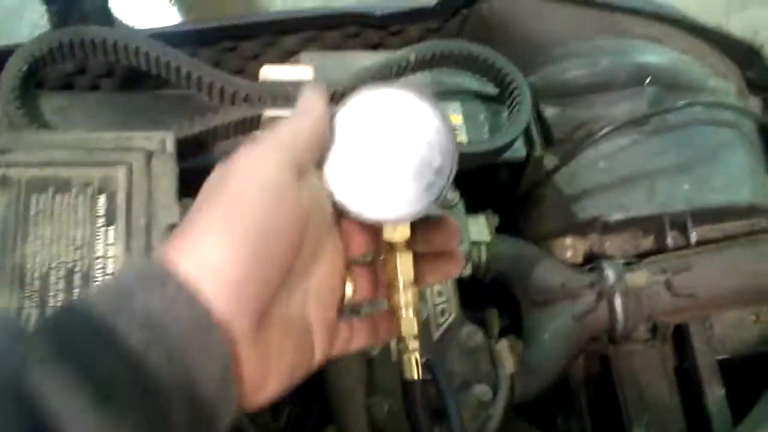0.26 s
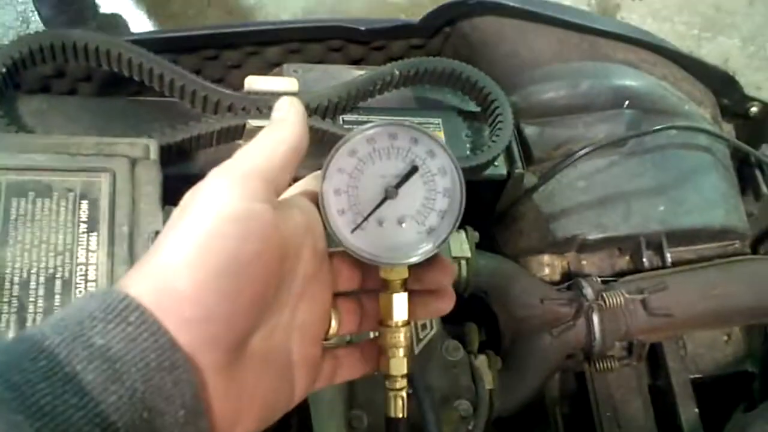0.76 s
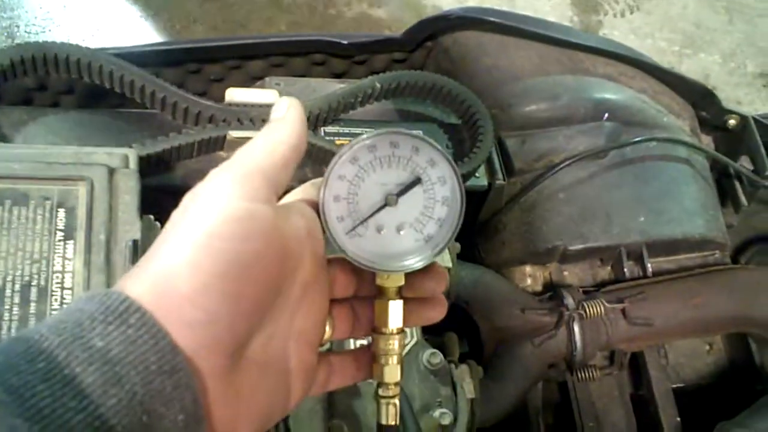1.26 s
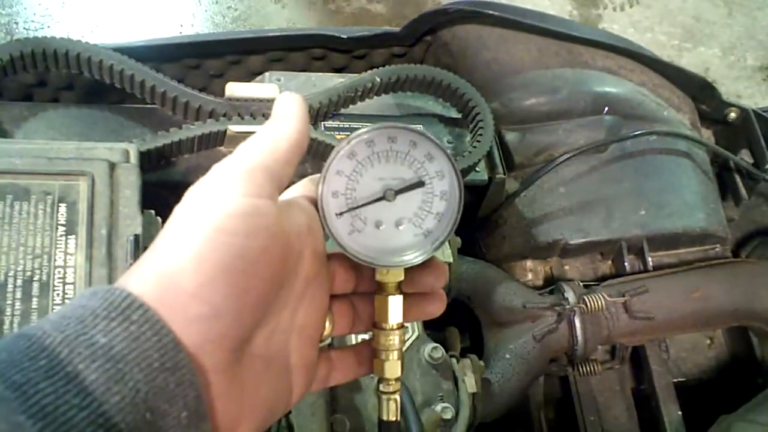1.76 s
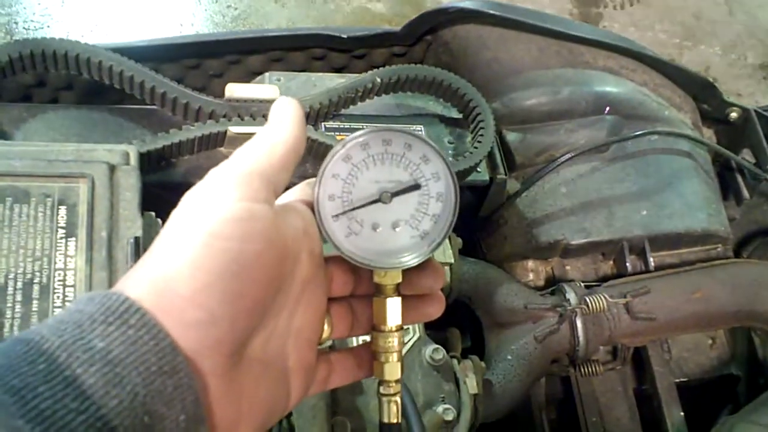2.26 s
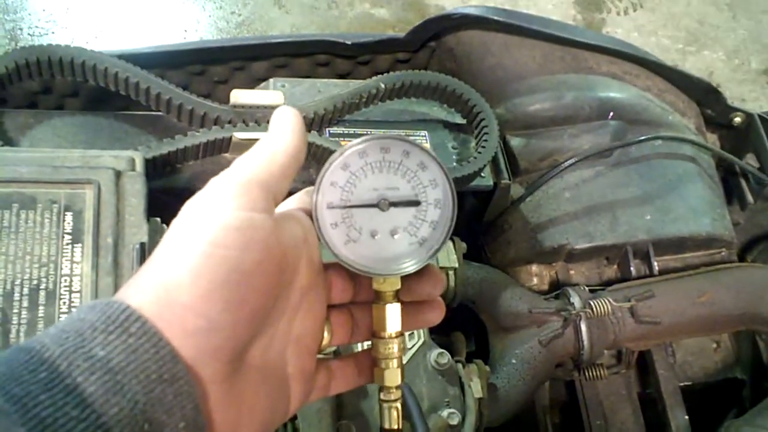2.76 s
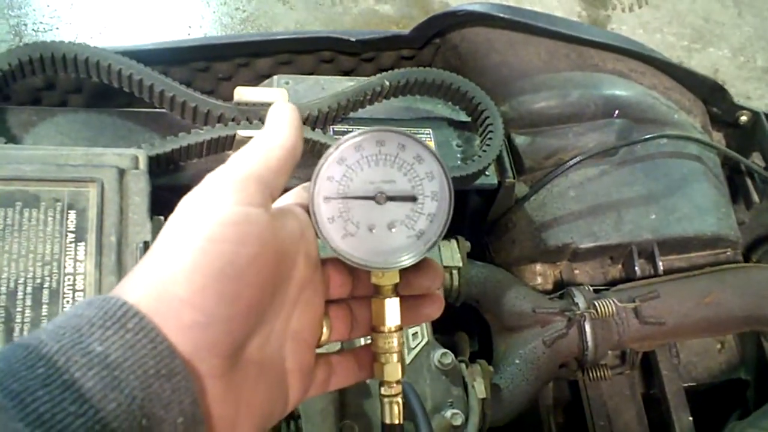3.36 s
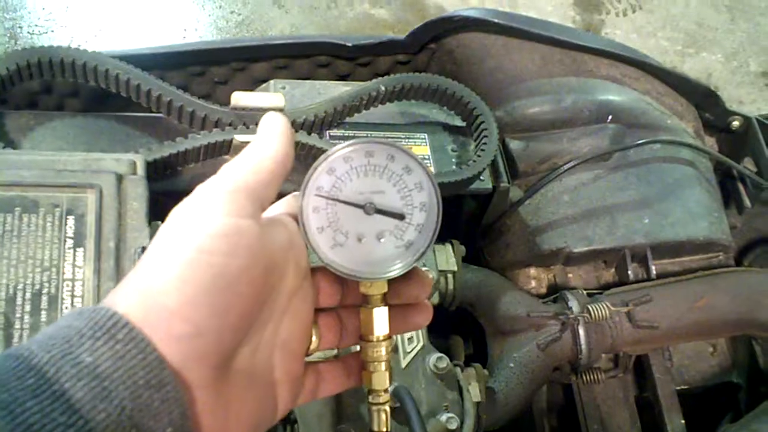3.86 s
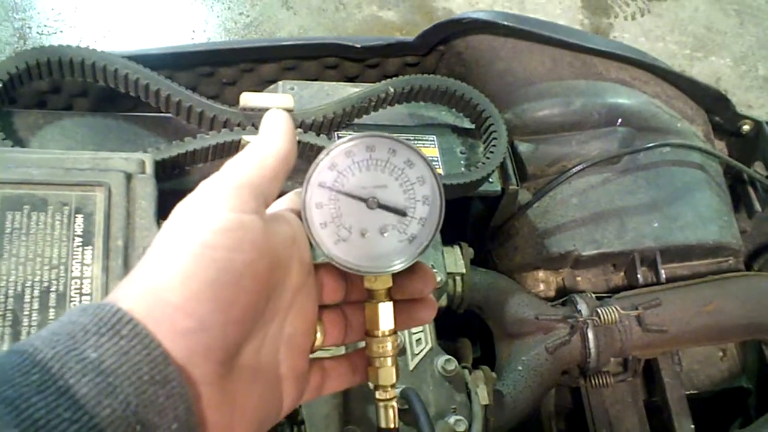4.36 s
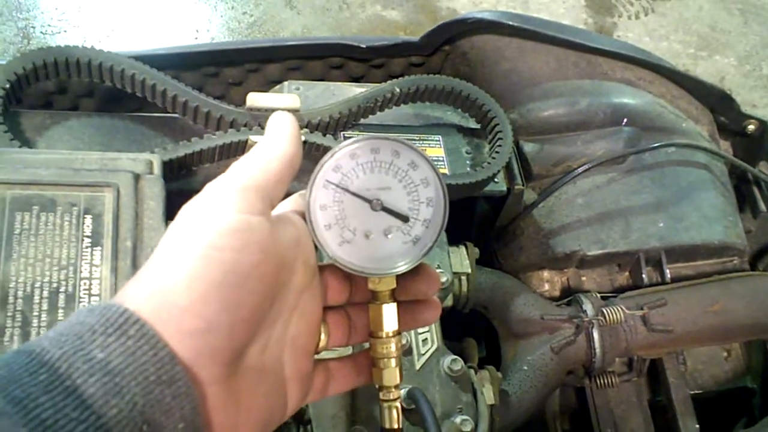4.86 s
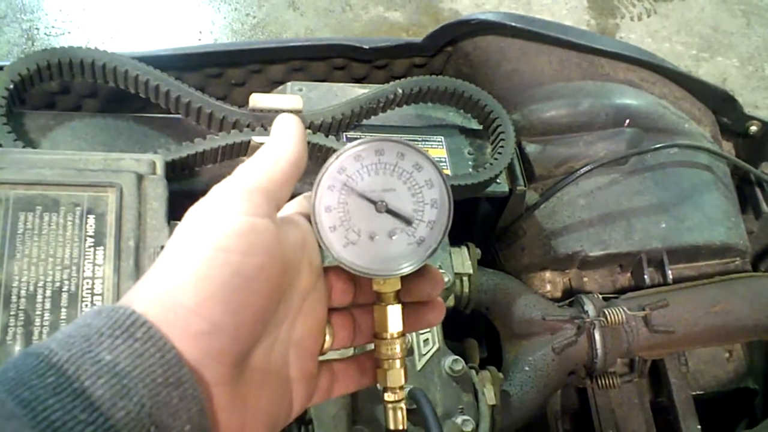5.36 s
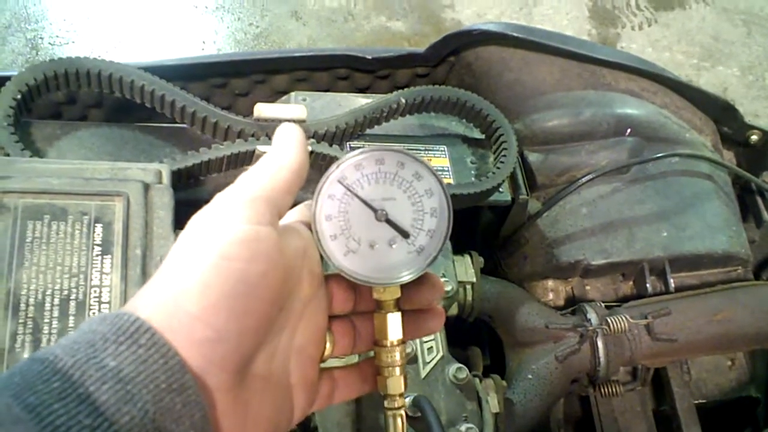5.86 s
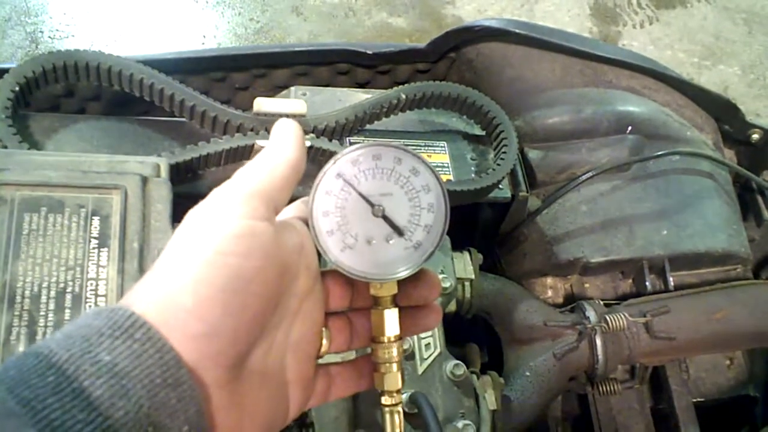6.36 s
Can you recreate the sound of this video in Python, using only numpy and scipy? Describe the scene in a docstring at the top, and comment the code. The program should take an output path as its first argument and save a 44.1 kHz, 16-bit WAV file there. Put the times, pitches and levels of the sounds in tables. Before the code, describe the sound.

After a few soft bumps and metal clinks, a two-stroke engine is pulled over six times by its rope starter, about once a second, never firing. Each pull gives a quick run of hollow chugs with sharp spits of air through a compression gauge. The starter rattles, rings briefly, whirrs faintly as it rewinds and clacks in again. A small microphone sits close by in a reverberant workshop.

```python
"""A few soft bumps and a clack of the starter, then sharp spits of air and hollow chugs: a two-stroke
twin is pulled over six times by its recoil starter, with a compression gauge in one plug hole.
The pistons push air through the gauge and boom in the engine body. The starter rattles and rings as
the rope runs out, whirrs down as it rewinds, and clacks into mesh for the next pull.
One small microphone, close to the engine, in a reverberant workshop."""
import sys
import numpy as np
from scipy import signal
from scipy.fft import rfft, irfft, next_fast_len
from scipy.io import wavfile
from scipy.ndimage import uniform_filter1d

SR = 44100
rng = np.random.default_rng(int(sys.argv[2]) if len(sys.argv) > 2 else 0)


def master_out(mix):
    """Clip the mix to full scale and print it as 16-bit PCM to the path in sys.argv[1]."""
    frames = np.transpose(np.atleast_2d(mix))
    ceiling = np.clip(frames, -1, 1)
    pcm = np.round(ceiling * 32767).astype(np.int16)
    wavfile.write(sys.argv[1], SR, pcm)


N = 291456

# Levels in the tables are relative; each source adds its own gain.
# Pulls of the rope. Each row: time of the fastest stroke in seconds, top speed in strokes a second,
# run-up and coasting widths in strokes, number of strokes before the fastest, chug level in dB,
# spit level in dB, extra dB for the first, partial stroke.
ROPE_PULLS = [(1.3524, 26.11, 5.825, 7.12, 5, -9.5, -24, -10),
              (2.4259, 25.77, 6.821, 6.99, 4, -10, -24.5, 1),
              (3.4364, 25.67, 3.922, 7.16, 4, -10.5, -26.5, -11),
              (4.462, 25.11, 4.53, 6.65, 4, -11.5, -25.5, -6.5),
              (5.484, 25.43, 4.391, 6.968, 4, -10.8, -27, -1),
              (6.4927, 25.55, 4.54, 8.5, 4, -11.5, -27.5, 0)]
# The two cylinders take turns, soft then loud. Each row: chug in dB, its change in dB per tenfold speed,
# the same two for the spit, the spit's lead on the chug in strokes, further lead in seconds.
CYLINDER_VOICES = [(-5, 24, -3, 27.5, 0.051, 0.0094), (0.03, 14, 0.57, -2.5, .305, 0.0087)]
# The pawls slam home after a clink of slack. Each row: time in seconds, blow in dB, ring in dB,
# the clink's lead in seconds, clink in dB.
PAWL_CLACKS = [(.397, -24, -30, 0.018, -40.5), (2.106, -12.5, -27, 0.006, -81),
               (3.149, -11.5, -26.5, 0.029, -33), (4.1762, -11, -25.5, 0.028, -34.5),
               (5.189, -12.5, -29, 0.018, -31.5), (6.194, -13.5, -33, 0.02, -32)]

# Single events. Each row: time in seconds, level in dB.
CRANK_STALLS = [(1.8106, -27.5), (3.91, -41.5)]  # the crank dies against one more compression: a spit with no chug
PULLEY_STRIKES = [(1.389, -35), (2.468, -35), (3.522, -38), (4.535, -39.5), (5.555, -37.5), (6.572, -36.5)]  # the rope nears its full length
ROPE_REWINDS = [(1.691, -69), (2.74, -42), (3.729, -40.5), (4.77, -39.5), (5.77, -41)]
STRAY_CLINKS = [(.342, -45), (.519, -50), (.838, -54), (.999, -53), (1.076, -49.5), (1.9, -46)]  # loose metal
HANDLING_BUMPS = [(.205, -42), (.220, -36.5), (.256, -33.5), (.272, -46)]

# Partials of the rewind's whirr. Each row: starting pitch in Hz, level in dB.
WHIRR_PARTIALS = [(1341.6, 3.5), (780, -3), (873.6, -5)]

# Resonances. Each row: frequency in Hz, width in Hz, level in dB.
BODY_MODES = [(132, 26, -7.5), (205, 46, -3), (301.6, 49, 2.5), (372, 100, -7.5), (551.5, 12, -1),
              (738, 50, 1), (1070, 150, -4), (1461.5, 44, -1)]  # engine and exhaust
HOSE_MODES = [(1391, 13, 15), (2547, 95, 7.5), (4030, 520, 13.5), (4477, 220, 14.5), (5450, 200, 7),
              (6200, 750, 1), (6120, 69, 5), (6600, 900, -2), (7950, 150, -7)]  # gauge hose and plug hole
HOUSING_MODES = [(570, 93, 3), (800, 91, 4), (1100, 52, -3.5), (1408, 33, 4), (1830, 51, -6.5)]  # starter housing
PAWL_MODES = [(281, 23, 1.5), (1467, 130, 6), (2100, 29, -4.5), (3790, 33, -17.5), (6150, 14, -10.5),
              (7800, 26, -5.5), (8650, 110, -4), (9830, 100, -15)]  # pawls and their steel cup
PULLEY_MODES = [(3740, 16, 2.5), (6250, 30, -4.5), (7840, 240, -0.5), (8740, 61, -7), (9230, 55, -16),
                (11600, 170, -13.5), (13700, 300, -19.5)]

# Tone colours. Each row: frequency in Hz, spectral level in dB.
CHUG_SPECTRUM = [(100, -46), (300, 9), (800, 8), (1500, 0.5), (2500, -7.5), (4000, -15.5), (8000, -33),
                 (16000, -48)]
SPIT_SPECTRUM = [(200, -21), (1000, 17), (2500, 11.5), (4500, 21), (7300, 17), (9000, 2.5), (12000, -2),
                 (16000, -14)]
RATTLE_SPECTRUM = [(25, -30), (70, -54), (130, 7), (300, -7), (550, -16), (950, -31), (1500, 2),
                   (2200, 0.5), (3200, -12.5), (7000, -11.5), (10000, -18), (13000, -29), (16000, -31)]
CRACK_SPECTRUM = [(60, -68), (300, 6.5), (800, -2.5), (2000, 3), (3500, -4.5), (7000, -11), (10000, -15),
                  (12500, -20.5), (16000, -33)]
CLINK_SPECTRUM = [(150, -31), (500, 9), (1500, 6), (2400, 9.5), (4500, -3.5), (8500, -3), (12000, -13.5),
                  (16000, -30)]
BUMP_SPECTRUM = [(100, -27), (280, 1), (600, 3.5), (1200, 7.5), (1600, -5.5), (2400, -8.5), (4000, -22),
                 (16000, -45)]  # the gauge knocks against the engine
REVERB_SPECTRUM = [(60, -3.5), (250, 5), (500, -4), (1400, -3.5), (8000, -12.5), (15000, -26)]
ROOM_TONE_SPECTRUM = [(30, -22), (120, -4), (350, 3), (1300, -1), (2500, -7.5), (5000, -9.5), (10000, -24),
                      (16000, -32)]

# The workshop's decay. Each row: frequency in Hz, time to fall 60 dB in seconds.
REVERB_T60 = [(120, 0.62), (500, 1.2), (1500, 2.01), (4000, 1.52), (8000, .5), (15000, 2)]


def crank(pull, crest_strokes=-.686, coast_strokes=6, drag=.0591, spin_up_s=.11, run_out_s=.15):
    """One pull: the crank speeds up and coasts down. Gives (seconds, dB) rows of chugs, spits, rattle."""
    fastest_s, top_speed, run_up, coasting, before, chug_db, spit_db, partial_db = pull
    stroke = np.arange(-round(before), coast_strokes + 1)
    loud = stroke % 2

    def speed_at(angle):
        """Share of top speed: a bell over the crank angle, counted in strokes."""
        past = angle - crest_strokes
        return np.exp(-(past / np.where(past < 0, run_up, coasting)) ** 2)

    strokes_per_s = top_speed * speed_at(stroke - .5) * (1 - drag * loud)  # every loud stroke drags
    clock = np.cumsum(1 / strokes_per_s)
    chug_s = fastest_s + clock - clock[stroke == 0]
    speed = speed_at(stroke)
    own_chug_db, chug_slope, own_spit_db, spit_slope, lead, lead_s = np.array(CYLINDER_VOICES)[loud].T
    spit_s = chug_s - lead_s - lead / (top_speed * speed)
    first_db = partial_db * (stroke == stroke[0])  # tells more on the spit than on the chug
    chug = chug_db + own_chug_db + chug_slope * np.log10(speed) + first_db
    spit = spit_db + own_spit_db + spit_slope * np.log10(speed) + 2.5 * first_db
    moving_s = np.r_[chug_s[0] - spin_up_s, chug_s, chug_s[-1] + run_out_s]
    rattle = chug_db - 23.5 - 19.5 * (1 - np.r_[0, speed, 0])  # sinks as the crank slows
    return np.c_[chug_s, chug], np.c_[spit_s, spit], np.c_[moving_s, rattle]


def chugs(strokes):
    """The piston's soft push booms in the engine body; then a flutter, a turbulent puff and a tick."""
    push = uniform_filter1d(kicks(strokes, delay=-0.00893), size=80)
    boom = ringing(push, BODY_MODES)
    puff = noise() * bursts(strokes, rise=0.0021, hold=0.0078, fall=0.0099, lead=0.0048)
    tick = ringing(kicks(strokes, delay=0.022), HOSE_MODES)
    return (amp(-6.5) * boom + flutter(strokes)
            + amp(-10.5) * coloured(puff, CHUG_SPECTRUM) + amp(-33) * tick)


def flutter(strokes, hz=497, length_s=0.01195, fade_s=0.0085):
    """Each gulp of air flutters for a few cycles, slightly peaked in shape."""
    count = int(length_s * SR)
    t, out = (np.arange(count) - count // 2) / SR, np.zeros(N)
    shape = signal.windows.tukey(count, 0.65) * np.exp(-t / fade_s)
    for s, db in strokes:
        pitch = hz * (1 + 0.0091 * rng.standard_normal())
        phase = 2 * np.pi * pitch * (t + .5 / hz)
        wave = np.cos(phase) + amp(-21) * np.cos(2 * phase) + amp(-19) * np.cos(3 * phase)
        add(out, s - .0053, amp(db + 1.5) * shape * wave)
    return out


def spits(squeezes):
    """Squeezed air snaps the gauge valve open and hisses briefly in the hose; a stall also knocks."""
    rows = [*squeezes, *CRANK_STALLS]
    jet = noise() * bursts(rows, rise=0.0004, hold=0.005, fall=0.0025, lead=0.004)
    snap = ringing(kicks(rows, delay=-.003), HOSE_MODES)
    knock = noise() * bursts(CRANK_STALLS, rise=0.00092, hold=0.004, fall=.006, lead=0.0032)
    hiss = amp(-1.2) * ringing(jet, HOSE_MODES) + amp(-2) * coloured(jet, SPIT_SPECTRUM)
    return hiss + amp(-13) * snap + amp(-2) * coloured(knock, CRACK_SPECTRUM)


def pawl_clacks():
    """The pawls scrape in and chatter home: a crack, the housing's knock and a ring of steel."""
    blows = [(s, db) for s, db, *_ in PAWL_CLACKS]
    rings = [(s, db) for s, _, db, *_ in PAWL_CLACKS]
    scrape = bursts(blows, rise=0.0016, hold=0.018, fall=0.002, lead=0.02)
    crack = noise() * (bursts(blows, rise=0.0029, hold=0.011, fall=0.007) + amp(-20.5) * scrape)
    knock = ringing(kicks(blows, delay=0.00414), HOUSING_MODES)
    shudder = ringing(noise() * bursts(blows, rise=0.012, hold=0.01, fall=0.0095), HOUSING_MODES)
    steel = ringing(kicks(rings, delay=.0065), PAWL_MODES)
    return (amp(-6.5) * coloured(crack, CRACK_SPECTRUM) + amp(-6) * knock
            + amp(-2.5) * shudder + amp(3.5) * steel)


def crank_rattle(strokes, rattle, start_s=1.036):
    """Rope, bearings and pistons rattle as the crank turns; loose parts tap hardest at each stroke."""
    s, db = np.transpose(rattle)
    t = np.arange(N) / SR
    level = amp(np.interp(t, s, db)) * np.clip((t - start_s) / 0.026, 0, 1)
    load = bursts(strokes, rise=0.0065, hold=0.017, fall=0.026, lead=0.04)
    load /= load.max()
    taps = loose_parts() * level * load ** 0.14
    rub = coloured(noise() * level, CHUG_SPECTRUM)
    drone = ringing(noise() * level * load ** 0.04, BODY_MODES)
    return (amp(1.67) * coloured(taps, RATTLE_SPECTRUM) + amp(-8.5) * ringing(taps, HOUSING_MODES)
            + amp(3) * rub + amp(6) * drone)


def loose_parts(min_gap_s=0.004, gap_spread_s=1 / 75, spread_db=19.5):
    """Loose parts tap at uneven intervals, each tap a short crackle of its own size. Rms 1."""
    gap, size = rng.random((N * 4 // 1000, 2)).T
    tap_s = np.cumsum(min_gap_s + gap_spread_s * gap)
    taps = np.c_[tap_s, spread_db * size][tap_s < N / SR]
    return unit_rms(noise() * bursts(taps, rise=0.00064, hold=0, fall=0.0064))


def pulley():
    """The starter pulley is struck and sings briefly near the fastest part of each pull."""
    scrape = noise() * bursts(PULLEY_STRIKES, rise=0.0088, hold=0.042, fall=0.025, lead=0.023)
    return ringing(amp(4.5) * scrape + amp(5) * kicks(PULLEY_STRIKES, delay=.004), PULLEY_MODES)


def rewinds(slowing_per_s=1.7, roughness=0.038):
    """The spring winds the rope in with a rough whirr that sinks in pitch."""
    t, out = np.arange(SR * 3 // 10) / SR, np.zeros(N)
    shape = signal.windows.tukey(len(t), .5) * np.exp(-t / 0.18)
    for s, db in ROPE_REWINDS:
        for start_hz, partial_db in WHIRR_PARTIALS:
            wobble = unit_rms(uniform_filter1d(rng.standard_normal(len(t)), size=100))
            hz = start_hz * np.exp(-slowing_per_s * t) * (1 + roughness * wobble)
            phase = 2 * np.pi * np.cumsum(hz) / SR
            add(out, s, amp(db + partial_db) * np.sin(phase) * shape)
    return out


def handling():
    """Loose metal and the slack starter clink; the gauge bumps softly on the engine."""
    slack = [(s - lead, db) for s, _, _, lead, db in PAWL_CLACKS]
    touches = [(s - 0.012, db - 12) for s, db in slack]  # a light touch just before the clink
    clink = noise() * bursts(STRAY_CLINKS + slack + touches, rise=0.00062, hold=0.0031, fall=0.008)
    bump = noise() * bursts(HANDLING_BUMPS, rise=0.00073, hold=0.0073, fall=0.012)
    return (amp(3) * coloured(clink, CLINK_SPECTRUM) + amp(-12) * ringing(clink, PAWL_MODES)
            + amp(-4.5) * coloured(bump, BUMP_SPECTRUM))


def workshop_reverb(close, early_db=-13, early_fall_s=0.014):
    """Quick scatter from the engine bay, then the room's tail, each band dying at its own speed."""
    t = np.arange(3 * SR // 2) / SR
    reflections = rng.standard_normal(len(t)) * (rng.random(len(t)) < .1) * (t > .006)
    early = reflections * np.exp(-t / early_fall_s)
    wash = rng.standard_normal(len(t)) * (1 - np.exp(-t / 0.023))
    hz, frame_s, bands = signal.stft(wash, SR, nperseg=256)
    band_db = curve_at(REVERB_SPECTRUM, hz)[:, None] - 60 * frame_s / curve_at(REVERB_T60, hz)[:, None]
    tail = signal.istft(bands * amp(band_db), SR, nperseg=256)[1][:len(t)]
    response = amp(early_db) * early / np.linalg.norm(early) + amp(-11) * tail / np.sqrt(SR / 20)
    return signal.fftconvolve(close, response)[:N]


def room_tone(air_db=-62, whine_hz=961, whine_db=-69):
    """The steady air of the workshop, with one faint whine in it."""
    whine = np.sin(2 * np.pi * whine_hz * np.arange(N) / SR)
    return amp(air_db) * coloured(noise(), ROOM_TONE_SPECTRUM) + amp(whine_db) * whine


def amp(db):
    """Decibels to gain."""
    return 10 ** (np.asarray(db) / 20)


def unit_rms(x):
    """Scales to rms 1."""
    return x / np.sqrt(np.mean(x ** 2) + 1e-20)


def curve_at(points, hz):
    """Reads a table on a log-frequency axis."""
    f, value = np.transpose(points)
    return np.interp(np.log(hz + 1), np.log(f + 1), value)


def noise():
    """White noise of rms 1."""
    return rng.standard_normal(N)


def coloured(x, spectrum):
    """Filters by a spectrum, keeping the power of white noise."""
    size = next_fast_len(N + SR // 4)
    gain = unit_rms(amp(curve_at(spectrum, np.fft.rfftfreq(size, 1 / SR))))
    return irfft(rfft(x, size) * gain, size)[:N]


def ringing(x, modes):
    """Drives damped modes of alternating sign; a mode's level sets its share of the power."""
    t = np.arange(SR // 3) / SR
    ring = np.zeros(len(t))
    for k, (hz, width, db) in enumerate(modes):
        decay = amp(db) * np.sqrt(width) * np.exp(-np.pi * width * t)
        ring += (-1) ** k * decay * np.sin(2 * np.pi * hz * t)
    return signal.oaconvolve(x, ring / np.linalg.norm(ring))[:N]


def add(mix, s, sound):
    """Mixes a sound in at s seconds."""
    part = mix[max(round(s * SR), 0):][:len(sound)]
    part += sound[:len(part)]


def bursts(rows, rise, hold, fall, lead=0):
    """Envelope of events that rise, hold and die away; times in seconds."""
    t, out = np.arange(SR // 4) / SR, np.zeros(N)
    shape = (1 - np.exp(-t / rise)) * np.exp(-np.maximum(t - hold, 0) / fall)
    for s, db in rows:
        add(out, s - lead, amp(db) * shape / shape.max())
    return out


def kicks(rows, delay):
    """One clean impulse an event, with the energy of 10 ms at the event's level."""
    out = np.zeros(N)
    for s, db in rows:
        add(out, s + delay, amp([db]) * np.sqrt(SR / 100))
    return out


def scene():
    """Engine and starter close to the microphone, the workshop behind them, in mono."""
    pulls = [crank(pull) for pull in ROPE_PULLS]
    strokes, squeezes, rattle = (np.vstack(rows) for rows in zip(*pulls))
    engine = chugs(strokes) + spits(squeezes) + crank_rattle(strokes, rattle)
    close = engine + pawl_clacks() + handling() + pulley() + rewinds()
    return (close + workshop_reverb(close) + room_tone())[None]


def record(dry, low_cut_hz=115, top_hz=16200):
    """A small microphone with little bass, and a steep cut above the top of its band."""
    thin = signal.sosfilt(signal.butter(2, low_cut_hz, "high", fs=SR, output="sos"), dry)
    band_limit = signal.firwin(511, top_hz, window=("kaiser", 9), fs=SR)
    return signal.oaconvolve(thin, band_limit[None], "same")


dry = scene()
out = record(dry)
master_out(out)
```